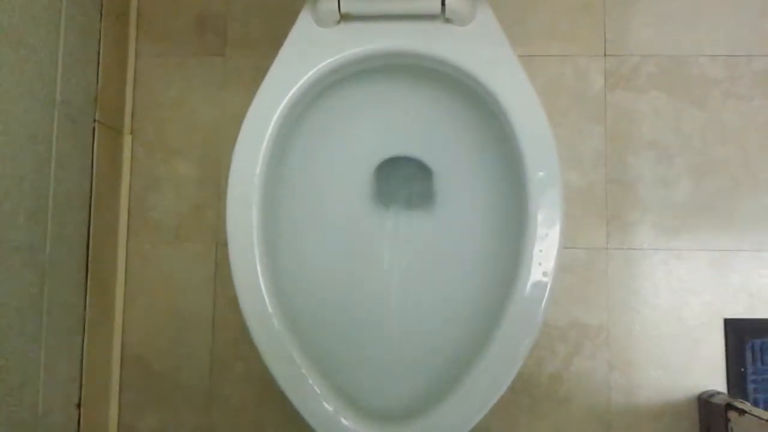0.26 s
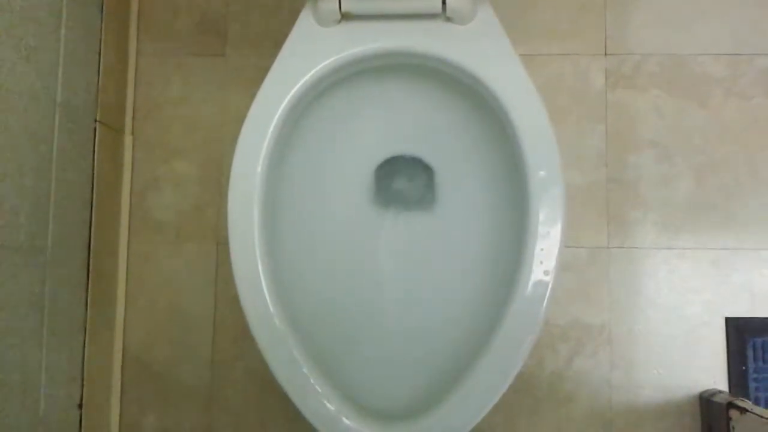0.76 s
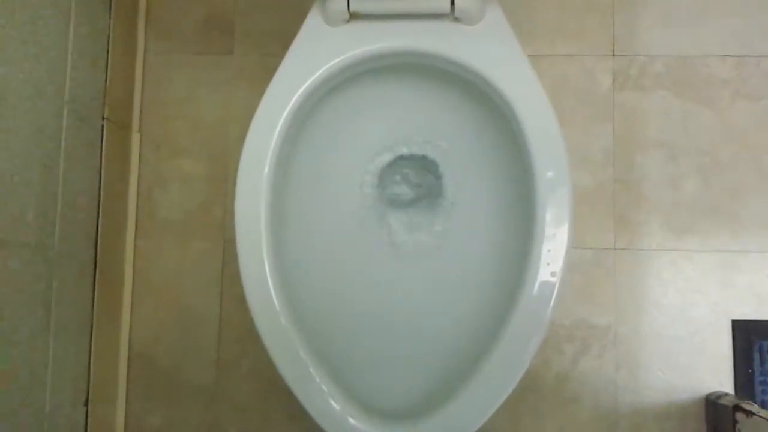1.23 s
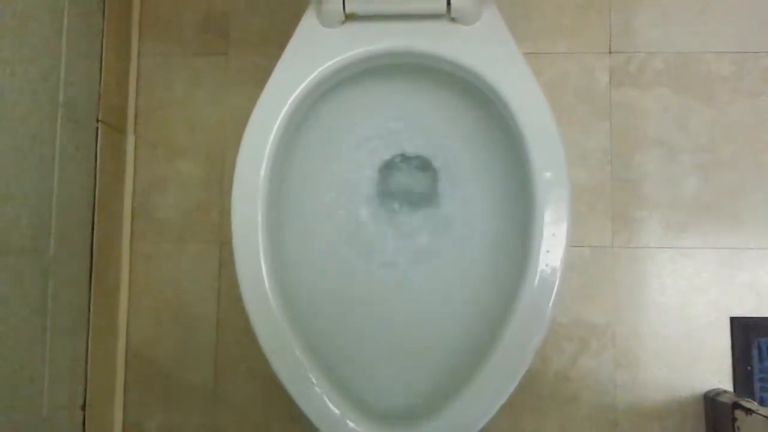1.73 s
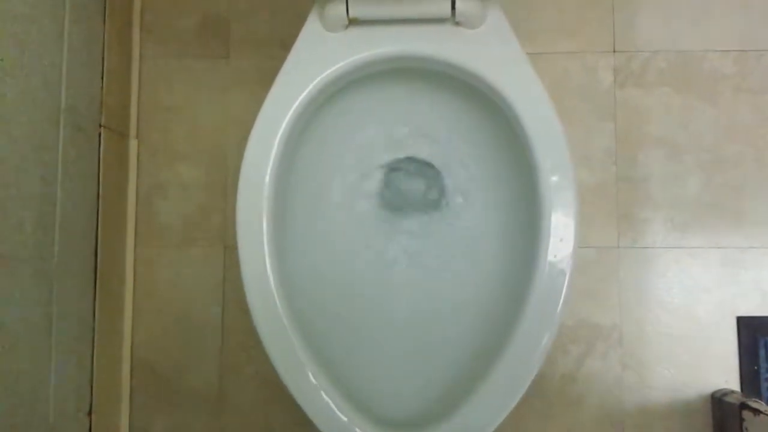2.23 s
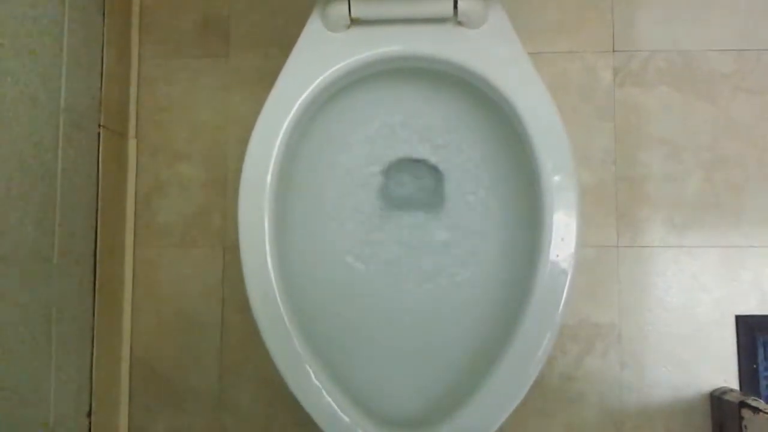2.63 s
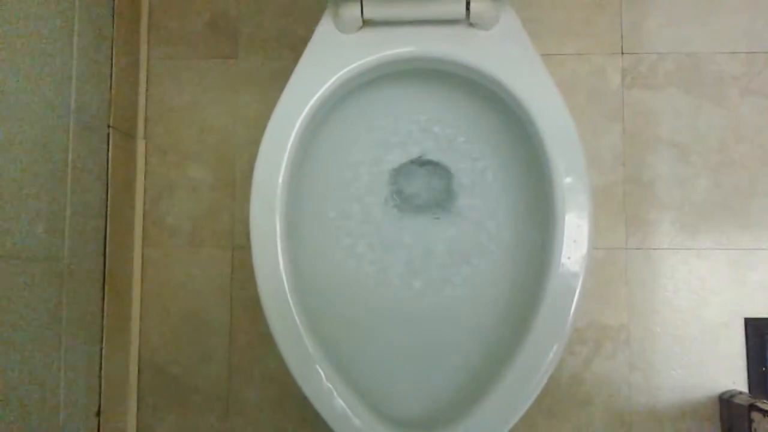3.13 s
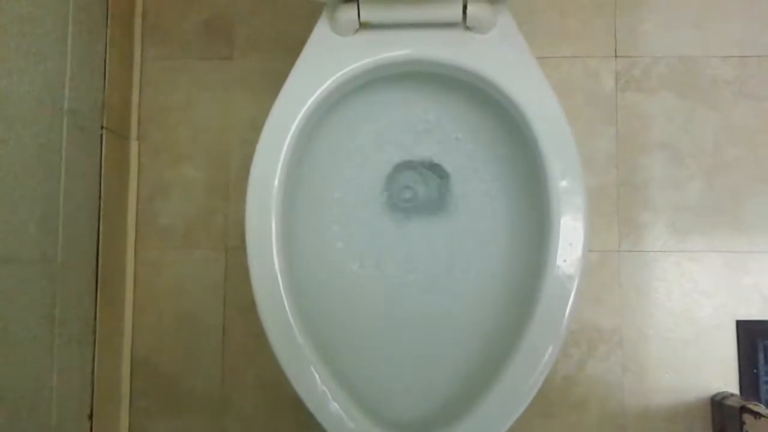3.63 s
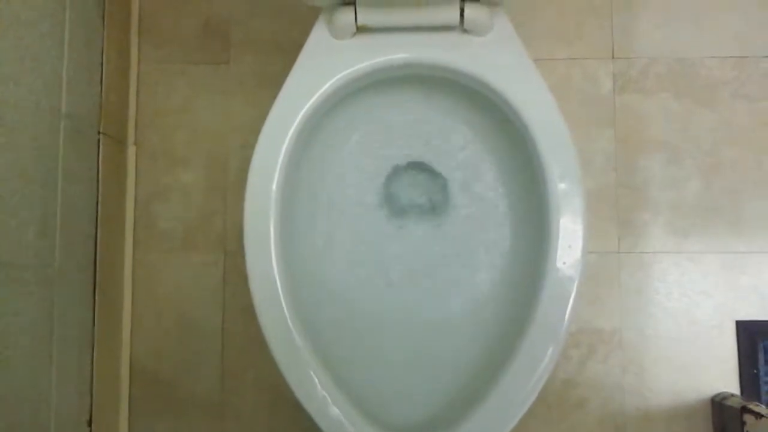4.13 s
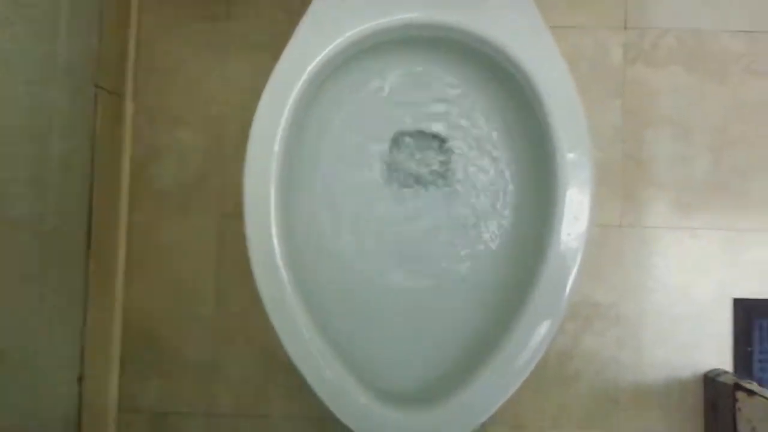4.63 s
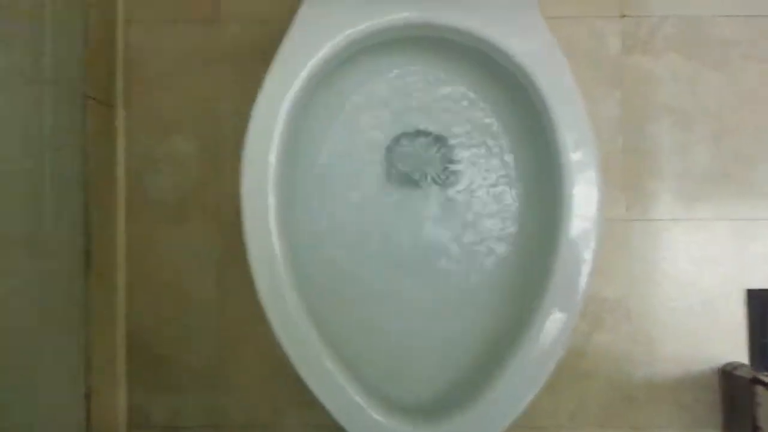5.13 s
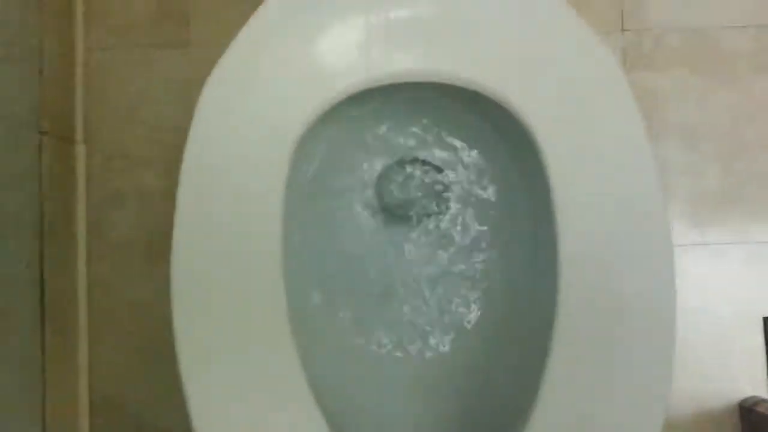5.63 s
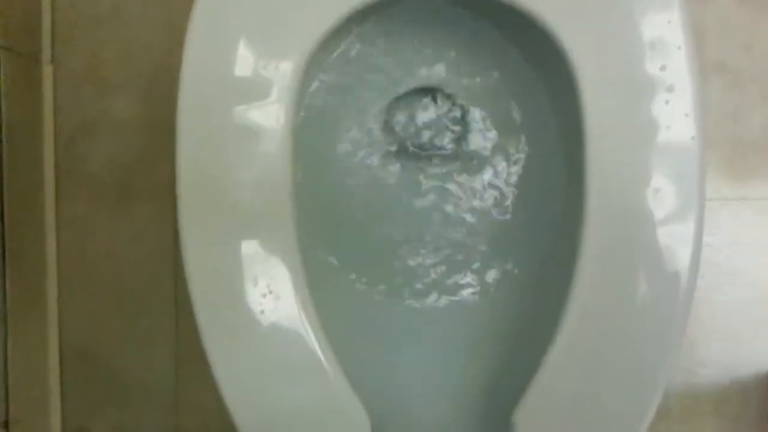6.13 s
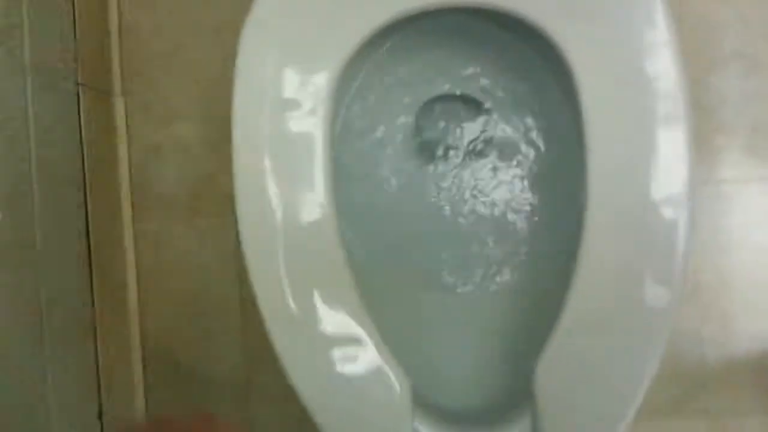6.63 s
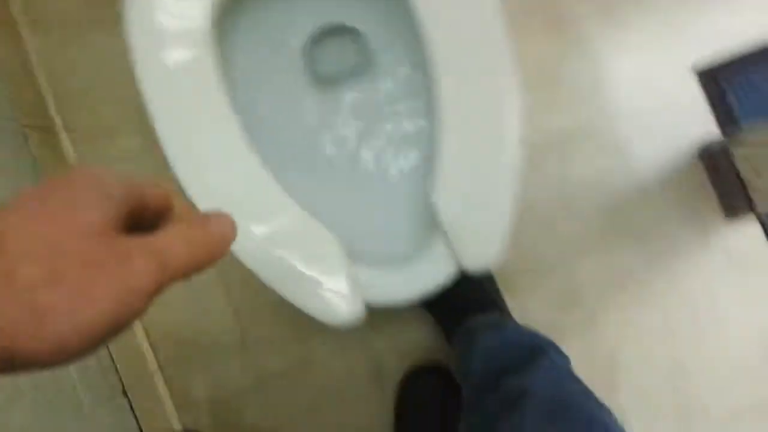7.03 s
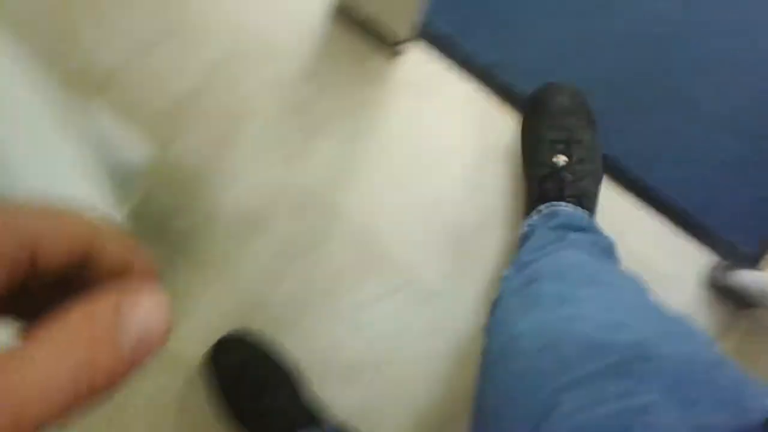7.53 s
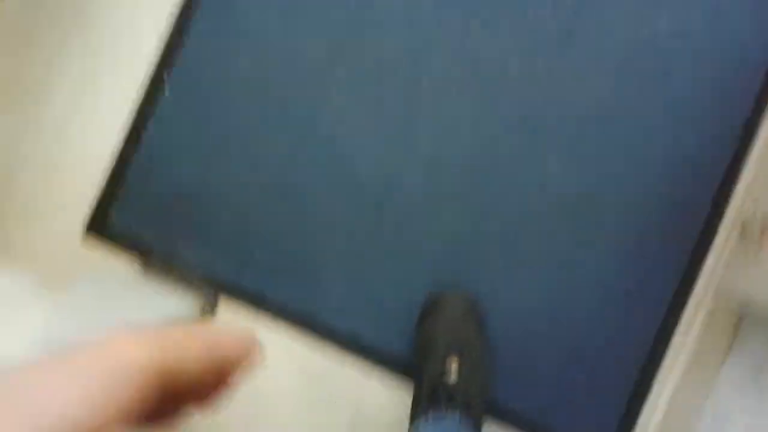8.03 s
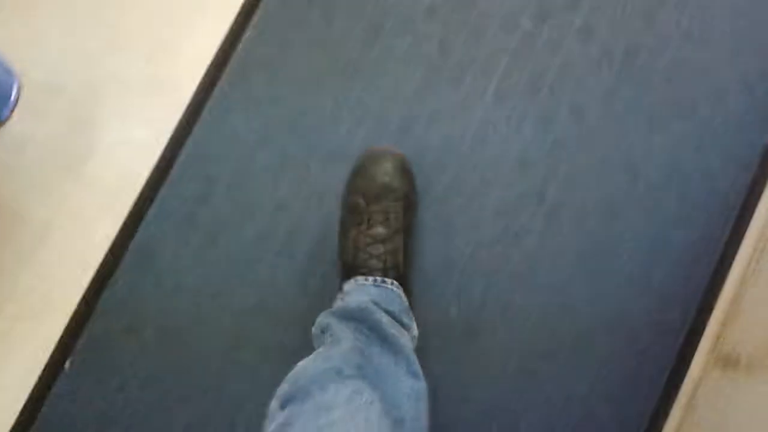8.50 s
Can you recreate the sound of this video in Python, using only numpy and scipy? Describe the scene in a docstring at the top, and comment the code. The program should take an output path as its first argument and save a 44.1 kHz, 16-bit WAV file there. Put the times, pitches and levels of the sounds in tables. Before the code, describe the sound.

Close, hand-held stereo pickup above a toilet in a small tiled restroom. The flush is already at full force, with splashing, bubbling, hissing jets and a booming drain, then quickly thins to trickling and weak gulps. Near-silence with faint ventilation follows, broken by finger bumps on the microphone. The plastic seat cracks down and rattles briefly, then shoes step and scuff softly over faint running water.

```python
"""A flush-valve toilet empties in a small tiled restroom: rim jets hiss, bubbles churn in the bowl and the
trapway booms, then gulps air as the flow dies. Over a faint wash of water and a humming ventilation the seat
drops onto the china, feet step and scuff, and fingers tick on the hand-held two-port microphone.
Water is shaped noise and swarms of ringing bubbles; the drain and the seat are resonances and dying sines;
steps and touches are short bursts. China and tiles add dense reflections."""
import sys
import numpy as np
from scipy import signal
from scipy.fft import rfft, irfft
from scipy.io import wavfile
from scipy.ndimage import uniform_filter1d

SR = 44100
rng = np.random.default_rng(int(sys.argv[2]) if len(sys.argv) > 2 else 0)


def int16_out(signal):
    """Quantize to a 16-bit WAV file."""
    q = np.round(np.clip(np.atleast_2d(signal).T, -1, 1) * 32767)
    wavfile.write(sys.argv[1], SR, q.astype(np.int16))


N = 386316
TIME = np.arange(N) / SR


def from_db(db):
    """Decibels to gain."""
    return 10 ** (np.asarray(db) / 20)


def rms_one(x):
    """Scale to unit power."""
    return x / np.sqrt(np.mean(x ** 2) + 1e-20)


def gains(rows):
    """Level curves as gains that die away quickly outside their span."""
    s, *columns = np.transpose(rows)
    outside = np.abs(TIME - np.clip(TIME, s[0], s[-1]))
    fade = np.exp(-np.minimum(outside / 0.049, 20))
    return [from_db(np.interp(TIME, s, column)) * fade for column in columns]


def at_hz(points):
    """A table read at every frequency, on a log axis."""
    hz, value = np.transpose(points)
    bins_hz = np.arange(N // 2 + 1) * SR / N
    return np.interp(np.log(bins_hz + 1), np.log(hz), value)


def colour(x, spectrum):
    """Give a sound a smooth spectrum."""
    return irfft(rfft(x) * from_db(at_hz(spectrum)), N)


# How alike diffuse sound is at the two microphone ports: (frequency [Hz], likeness [0-1])
PORT_LIKENESS = [(60, .92), (290, .96), (630, .8), (1370, .3), (3000, 0), (14000, 0)]


def diffuse(spectrum):
    """Noise from all sides: alike at both ports in the bass, unrelated in the treble."""
    alike = np.clip(at_hz(PORT_LIKENESS), -1, 1)
    mid, side = rfft(rng.standard_normal((2, N)))
    both = np.sqrt(1 + alike) * mid + np.sqrt(1 - alike) * side * [[1], [-1]]
    return rms_one(irfft(both * from_db(at_hz(spectrum)), N))


def drift(rate):
    """Chance wandering with spread 1, through rate new values per second."""
    knots = rng.standard_normal(int(N / SR * rate) + 2)
    return rms_one(np.interp(TIME * rate, np.arange(len(knots)), knots))


def even(x, span_s):
    """Hold the power steady over a span, keeping the faster grain."""
    power = np.mean(np.atleast_2d(x) ** 2, axis=0)
    smooth = np.abs(uniform_filter1d(power, int(span_s * SR)))
    return x / np.sqrt(smooth + 1e-4 * power.mean())


def grains(per_s, spread_db):
    """Clicks at random moments, of uneven size and sign."""
    born = np.flatnonzero(rng.random(N) < per_s / SR)
    clicks = np.full(N, 1e-18)
    size_db = spread_db * np.minimum(rng.exponential(1, len(born)), 4)
    clicks[born] = from_db(size_db) * rng.choice([-1, 1], len(born))
    return clicks


def resonate(x, hz, width_hz):
    """A two-pole resonance with gain 1 on top."""
    r = np.exp(-np.pi * width_hz / SR)
    feedback = [1, -2 * r * np.cos(2 * np.pi * hz / SR), r * r]
    return signal.lfilter(np.array([1, 0, -1]) * (1 - r * r) / 2, feedback, x)


def ping(s, hz, t60, rise=0):
    """A dying sine from time s, its pitch rising by a share per t60."""
    out, start = np.zeros(N), int(s * SR)
    age = TIME[:min(int(2 * t60 * SR), N - start)]
    cycles = hz * age * (1 + rise * age / t60 / 2)
    out[start:start + len(age)] = from_db(-60 * age / t60) * np.sin(2 * np.pi * cycles)
    return out


def swells(times, levels_db, attack_s, t60):
    """Envelope of bursts that rise fast and die away; their powers add."""
    power = np.zeros(N)
    for s, db in zip(times, levels_db):
        start = int(s * SR)
        age = TIME[:min(int(2 * t60 * SR), N - start)]
        burst = from_db(db - 60 * age / t60) * (1 - np.exp(-age / attack_s))
        power[start:start + len(age)] += burst ** 2
    return np.sqrt(power)


def restroom(x, wet_db, t60):
    """Direct sound plus dense reflections from china and tiles."""
    age = TIME[:SR // 2]
    tail = diffuse([(100, 0), (14000, 0)])[:, :len(age)] * from_db(-60 * age / t60) * (age > .001)
    tail = tail / np.sqrt(np.sum(tail ** 2) / 2)
    reflected = signal.fftconvolve(np.atleast_2d(x), tail, axes=1)[:, :N]
    return (x + from_db(wet_db) * reflected) / np.hypot(1, from_db(wet_db))


def bubbles(low_hz, high_hz, per_s, cycles, spread_db, count):
    """A swarm of bubbles of many sizes, each ringing for a few cycles; even power per Hz."""
    pitches = np.geomspace(low_hz, high_hz, count)
    return sum(resonate(grains(per_s / count, spread_db), hz, 2 * hz / cycles) for hz in pitches)


# The valve closes slowly and the rush dies with it; levels before each layer's trim:
# (time [s], splash level [dB], jet hiss level [dB])
RUSH_LEVELS = [(0.0, -21, -25), (0.14, -23.5, -26.5), (0.31, -26.5, -28), (0.68, -30.5, -32.5),
               (0.92, -36, -33), (1.12, -49, -39), (1.33, -50.5, -43.5), (1.55, -46, -43.5),
               (2.13, -55, -51.5), (2.62, -54.5, -51.5), (2.93, -62.5, -55.5), (3.38, -63.5, -66.5),
               (3.8, -76.5, -82)]
# Share of the hiss that narrows to the ring of the rim holes, until they run dry: (time [s], share [0-1])
HISS_NARROWING = [(.6, .05), (1.5, 0.5), (2.85, .62), (3.25, .1)]


def bowl():
    """The rush drives churning water and rim jets; every big bubble that bursts adds splash and spray."""
    splash, hiss = gains(RUSH_LEVELS)
    thin = np.clip(np.interp(TIME, *np.transpose(HISS_NARROWING)), .01, 1)
    s, plop_db, _ = np.transpose(BIG_BUBBLES)
    bursts = swells(s, plop_db, attack_s=0.0015, t60=0.17)
    return churn(splash, bursts, thin) + jets(hiss, bursts, thin)


# Spectrum of the churning water: (frequency [Hz], level [dB per Hz])
SPLASH_SPECTRUM = [(60, -46), (200, -21.5), (370, -1.5), (480, -7.5), (650, -8.5), (850, -1), (1300, -3.5),
                   (1650, 0.5), (2600, -0.5), (3400, -5.5), (4500, -13), (8000, -39.5)]
SPLASH_TRIM_DB = 2.5
PLOP_SPLASH_DB = -15  # splash of a bursting bubble, before the trim of the bubble's own ring
DRIPS_DB = -4  # stray drips, relative to the splash


def churn(splash, bursts, thin):
    """Water churns as a ringing bubble swarm with crackle and noise, hollowed by the china; drips stand out."""
    swarm = colour(bubbles(370, 5000, per_s=1000, cycles=20, spread_db=5.0, count=30), SPLASH_SPECTRUM)
    crackle = rms_one(colour(grains(500, spread_db=3.5), SPLASH_SPECTRUM))
    water = rms_one(swarm) + from_db(-5) * crackle + from_db(-9.5) * diffuse(SPLASH_SPECTRUM)
    water = even(restroom(water, wet_db=1.5, t60=0.13), 0.13)
    # as the pressure falls, single drips stand out
    drips = bubbles(1620, 2500, per_s=88, cycles=58, spread_db=1.5, count=10)
    drips = even(restroom(drips, wet_db=4.5, t60=0.12), 0.3) * np.sqrt(thin / thin.max())
    splash = from_db(SPLASH_TRIM_DB) * splash
    return np.hypot(splash, from_db(PLOP_SPLASH_DB) * bursts) * water + from_db(DRIPS_DB) * splash * drips


# Spectrum of the full jets: (frequency [Hz], level [dB per Hz])
JET_SPECTRUM = [(1500, -24), (3300, -15.5), (4300, -0.5), (5300, 2.5), (6500, -5), (7600, -12),
                (10000, -14.5), (12800, -15), (14500, -23)]
# Spectrum of the hiss narrowed to the ring of the rim holes: (frequency [Hz], level [dB per Hz])
THIN_JET_SPECTRUM = [(1500, -28), (3300, -15.5), (4100, -16), (4800, -7.5), (5350, -3.5), (5950, -11),
                     (6600, -8), (7600, -16.5), (10500, -23.5), (13000, -19.5), (14500, -24.5)]
HISS_TRIM_DB, HISS_FLUTTER_DB, HISS_FLUTTER_PER_S = 3.5, 1.4, 20
PLOP_SPRAY_DB = -24.5  # spray of a bursting bubble, before the trim of the bubble's own ring
FLECKS_DB = -9.5  # flecks of spray hitting the china, relative to the hiss


def jets(hiss, bursts, thin):
    """Rim jets hiss as noise and fizz as tiny bubbles, narrowing with falling pressure; flecks hit the china."""
    fizz = bubbles(3300, 12000, per_s=2000, cycles=9.8, spread_db=7.0, count=12)
    fizz = even(colour(fizz, JET_SPECTRUM), 0.03)
    spray = rms_one(fizz + from_db(6.5) * diffuse(JET_SPECTRUM))
    mixed = np.sqrt(1 - thin) * spray + np.sqrt(thin) * diffuse(THIN_JET_SPECTRUM)
    mixed = rms_one(restroom(mixed, wet_db=-8.0, t60=0.03))
    flecks = bubbles(4200, 6300, per_s=45, cycles=17, spread_db=-3.5, count=8)
    flecks = even(restroom(flecks, wet_db=10.0, t60=0.045), 0.34)
    hiss = from_db(HISS_TRIM_DB + HISS_FLUTTER_DB * drift(HISS_FLUTTER_PER_S)) * hiss
    return np.hypot(hiss, from_db(PLOP_SPRAY_DB) * bursts) * mixed + from_db(FLECKS_DB) * hiss * flecks


# Large single bubbles, levels before the trim: (time [s], level [dB], starting pitch [Hz])
BIG_BUBBLES = [(0.088, -12, 1590), (0.125, -9.5, 1636), (0.157, -12, 1580), (0.211, -15, 2000),
               (0.279, -19.5, 798), (0.362, -15.5, 826), (0.516, -17, 2560), (0.568, -18.5, 932),
               (0.672, -19, 2200), (0.752, -17, 2600), (0.942, -15, 1800), (0.974, -18.5, 2240),
               (1.012, -18.5, 3560), (1.084, -21.5, 2820), (1.108, -14, 4920), (1.33, -34.5, 1016),
               (1.344, -28, 1504), (1.455, -31, 1980), (1.5, -37.5, 946), (1.598, -26, 1294),
               (1.626, -26, 864), (1.643, -24.5, 718), (1.665, -33, 698), (1.803, -30.5, 1610),
               (2.488, -33, 2200), (2.525, -27.5, 1670), (2.578, -30, 4450), (3.774, -46, 2280),
               (3.86, -51, 1967)]
PLOP_TRIM_DB = -2.0


def plops():
    """Big bubbles ring and rise in pitch as they reach the surface; the bowl's echoes roughen them."""
    rings = sum(from_db(db) * ping(s, hz, .008 + 62 / hz, rise=.09) for s, db, hz in BIG_BUBBLES)
    return from_db(PLOP_TRIM_DB) * restroom(rings, wet_db=3.0, t60=.16)


# Gulps of air in the trapway, levels before the trims:
# (time [s], length [s], boom level [dB], rumble level [dB])
AIR_GULPS = [(0.0, 0.015, -25.5, -39), (0.109, 0.035, -25, -36.5), (.195, 0.018, -20.5, -31),
             (0.244, 0.019, -27, -45), (.32, 0.046, -30.5, -55), (0.438, 0.11, -21, -39),
             (0.508, 0.1, -19, -36.5), (0.741, 0.023, -24, -33.5), (0.865, 0.013, -28, -57),
             (0.934, 0.035, -43, -49), (1.322, 0.05, -42.5, -51), (1.454, 0.024, -41.5, -41),
             (1.514, 0.018, -37, -38.5), (1.589, 0.04, -31, -51), (2.342, 0.043, -43, -54),
             (2.898, .01, -41.5, -53), (2.97, 0.011, -48.5, -48), (3.073, 0.043, -40, -41),
             (3.158, 0.019, -37, -43.5), (3.227, 0.013, -38.5, -39.5), (3.306, .01, -40, -40),
             (3.357, 0.042, -40.5, -43.5), (3.435, 0.032, -37, -41.5), (3.501, .01, -43, -44.5),
             (3.58, 0.0074, -41.5, -41.5)]
GULP_ATTACK_S, GULP_T60_S = .004, 0.28


def gulping(levels_db):
    """Envelope of the gulps: each rises, holds for its length and dies away; their powers add."""
    power = np.zeros(N)
    for (s, length, *_), db in zip(AIR_GULPS, levels_db):
        start = max(int(s * SR), 0)
        age = TIME[:SR]
        decay = from_db(-60 * np.maximum(age - length, 0) / GULP_T60_S)
        shape = (1 - np.exp(-age / GULP_ATTACK_S)) * decay
        power[start:start + SR] += (from_db(db) * shape) ** 2
    return np.sqrt(power)


# Droplets spat up by the last gulps, levels before the trim: (time [s], level [dB])
DROPLET_SPITS = [(3.0805, -46), (3.1694, -65), (3.236, -46), (3.305, -47), (3.3847, -53), (3.454, -53),
                 (3.4994, -55), (3.59, -46.5)]
# Spectrum of the droplets: (frequency [Hz], level [dB per Hz])
DROPLET_SPECTRUM = [(1200, -17), (2000, -9), (3200, -5.5), (4600, 3), (6200, -3), (7500, -11), (14000, -11)]
# Spectrum of the fine spray that hangs after the spits: (frequency [Hz], level [dB per Hz])
MIST_SPECTRUM = [(2000, -22), (6000, 0), (14000, 0)]


def spits():
    """The last gulps throw up ringing droplets and a lingering mist of noise."""
    times, levels_db = np.transpose(DROPLET_SPITS)
    drops = bubbles(1500, 7000, per_s=900, cycles=25, spread_db=3.0, count=10)
    drops = even(restroom(colour(drops, DROPLET_SPECTRUM), wet_db=10.0, t60=0.19), 0.031)
    droplets = drops * from_db(2.0) * swells(times, levels_db, attack_s=0.0033, t60=0.097)
    mist = diffuse(MIST_SPECTRUM) * from_db(-16.5) * swells(times, levels_db, attack_s=.008, t60=0.71)
    return droplets + mist


# Steady draw of the drain between gulps, before the trims: (time [s], boom level [dB], rumble level [dB])
DRAIN_LEVELS = [(0.0, -39, -41.5), (0.95, -49, -50.5), (1.25, -60.5, -54), (1.6, -44.5, -45.5),
                (2.2, -50, -48.5), (2.9, -55, -54)]
# Overtones of the trapway's air column: (frequency [Hz], width [Hz], level [dB])
AIR_COLUMN_OVERTONES = [(368, 6.4, -0.5), (604.3, 20, 2.5), (932, 8, 4), (1264, 18, -2), (1611, 18, -6.5),
                        (1921, 40, -6), (2180, 91, -10.5), (2490, 36, -17)]
# Spectrum of the drain's rumble: (frequency [Hz], level [dB per Hz])
RUMBLE_SPECTRUM = [(25, -35.5), (45, -27), (62, -2), (85, -4), (113, 2.5), (150, 3), (190, -13.5),
                   (235, -13.5), (330, -16), (500, -30.5), (1500, -78)]
TRAP_HZ, TRAP_WIDTH_HZ = 284, 40  # lowest mode of the air column
BOOM_TRIM_DB, RUMBLE_TRIM_DB, OVERTONES_TRIM_DB, SHOVE_TRIM_DB = -3.5, -1.83, -10, -0.5


def trapway():
    """Collapsing air pockets drive the air column of the drain: a steady draw broken by gulps."""
    s, _, boom_db, rumble_db = np.transpose(AIR_GULPS)
    steady_boom, steady_rumble = gains(DRAIN_LEVELS)
    boom = np.hypot(steady_boom, gulping(boom_db))
    rumble = np.hypot(steady_rumble, gulping(rumble_db))
    pockets = grains(420, spread_db=2.0)
    # the lowest mode sustains itself as a wavering tone, roughened by the pockets
    pitch_hz = TRAP_HZ * (1 + .018 * drift(55))
    tone = np.sqrt(2) * np.sin(2 * np.pi * np.cumsum(pitch_hz) / SR)
    rattle = rms_one(resonate(resonate(pockets, TRAP_HZ, TRAP_WIDTH_HZ), TRAP_HZ, 230))
    loud = np.clip(boom / from_db(-40.5), .1, 1)  # a weak flow mostly rattles the mode
    column = even(loud * tone + from_db(-2.5) * rattle, 0.064)
    # each gulp shoves the water in the bowl
    shove = sum(from_db(db + SHOVE_TRIM_DB) * ping(max(at, 0), 63, 0.1) for at, db in zip(s, rumble_db))
    overtones = sum(from_db(db) * resonate(pockets, hz, width) for hz, width, db in AIR_COLUMN_OVERTONES)
    body = from_db(RUMBLE_TRIM_DB) * even(diffuse(RUMBLE_SPECTRUM), 0.12)
    body = body + from_db(OVERTONES_TRIM_DB) * even(overtones, .06)
    return from_db(BOOM_TRIM_DB) * boom * column + rumble * body + shove + spits()


# The seat lands and bounces, levels before the trims: (time [s], level [dB])
SEAT_LANDINGS = [(6.0971, -16.5), (6.1183, -23.5), (6.1467, -28)]
# Modes of the seat on the rim, before a slight stretch: (frequency [Hz], level [dB], t60 [s])
SEAT_RESONANCES = [(479, -9, .19), (635, -12, .2), (904, -1, .22), (980, -1, .23), (1044, -6, .27),
                   (1114, -9, .22), (1529, -7, .16), (1653, -5, .12), (1868, -5, .15), (1970, -5, .16),
                   (2196, -5, .15), (2239, -7, .16), (2573, -13, .15), (2729, -9, .12), (3214, -6, .13)]
# Spectrum of the seat's clap: (frequency [Hz], level [dB per Hz])
SEAT_SPECTRUM = [(60, -33), (120, 0), (300, -9.5), (480, -11), (720, -5), (950, 6), (1350, -9), (1600, 0.5),
                 (2200, -7), (2700, -10.5), (3300, -15.5), (4500, -21), (7500, -41.5), (12000, -88)]
SEAT_RING_DB = -7


def seat():
    """The hard plastic seat cracks onto the rim, clatters and rings; the tiles throw the clap back."""
    s, db = np.transpose(SEAT_LANDINGS)
    rings = np.zeros(N)
    for at, hit_db in SEAT_LANDINGS:
        for hz, level_db, t60 in SEAT_RESONANCES:
            rings += from_db(hit_db + level_db) * rng.choice([-1, 1]) * ping(at, hz, 1.03 * t60)
    # the rings are dulled above 3.8 kHz
    rings = signal.sosfilt(signal.butter(2, 3800, fs=SR, output="sos"), rings)
    crack = swells(s, db - 2.5, attack_s=.0001, t60=0.035)
    echo = swells(s, db - 7.5, attack_s=0.013, t60=0.28)
    clap = even(diffuse(SEAT_SPECTRUM), 0.0024) * (crack + echo)
    return (from_db(SEAT_RING_DB) * rings + clap) * from_db([[1.2], [-1.2]])  # stronger at the left port


# Footfalls and bumps, before the trims:
# (time [s], level [dB], thud relative level [dB], scuff relative level [dB])
FOOTFALLS = [(5.083, -41.5, -13.5, -7), (6.768, -40, -6, -6), (6.883, -27.5, -12, -7.5),
             (7.036, -44, -10, -7), (7.241, -41.5, -14, -10.5), (7.402, -44, -16, -12),
             (7.7, -45, -9.5, -7), (7.82, -49, -17, -7), (8.154, -44.5, -9, -6.5), (8.581, -44, 4, -8)]
# Spectrum of the thud in the floor: (frequency [Hz], level [dB per Hz])
THUD_SPECTRUM = [(30, -34), (70, 2.5), (110, 2), (170, 4), (240, -9), (400, -11), (1500, -80)]
# Spectrum of the hollow clunk in the stall: (frequency [Hz], level [dB per Hz])
CLUNK_SPECTRUM = [(60, -40.5), (150, -9), (250, -1.5), (360, -1), (480, -12.5), (700, -9.5), (1100, -22),
                  (4000, -71)]
# Spectrum of the scuffing sole: (frequency [Hz], level [dB per Hz])
SCUFF_SPECTRUM = [(500, -44), (900, 3), (1400, 5.5), (2200, 8.5), (3300, 2.5), (5000, -3.5), (7500, -17.5),
                  (14000, -47)]
SETTLE_S, SETTLE_DB = 0.061, -12.5  # the weight settles in a second, weaker contact


def steps():
    """Shoes and bumps: floor thud, hollow stall clunk, scuff. Light steps roll on slowly and last longer."""
    s, db, thud_db, scuff_db = np.transpose(FOOTFALLS)
    light = np.clip((-41.5 - db) / 4.5, 0, 1)
    floor, stall = even(diffuse(THUD_SPECTRUM), 0.045), even(diffuse(CLUNK_SPECTRUM), 0.023)
    sole = diffuse(SCUFF_SPECTRUM)

    def blows(levels_db, attack_s, t60):
        """Envelope of all steps; attack and decay are those of a firm step."""
        total = np.zeros(N)
        for at, level_db, soft in zip(s, levels_db, light):
            contacts_db = level_db - 1.4 * soft + np.array([0, SETTLE_DB])
            total += swells([at, at + SETTLE_S], contacts_db, attack_s + 0.011 * soft, t60 + 0.126 * soft)
        return total

    thuds = floor * blows(db + thud_db - 2, 0.0018, 0.44)
    clunks = stall * blows(db - 6.5, 0.00068, 0.22)
    return thuds + clunks + sole * blows(db + scuff_db - 2.0, 0.00032, 0.14)


# Fingers on the microphone's case, before the rub's trim and the bass cut: (time [s], bump level [dB],
# bump [Hz], tick level [dB], tick [Hz], rub level [dB], rub t60 [s], left-right balance [dB])
FINGER_TOUCHES = [(4.2937, -17.5, 336, -27, 1590, -34, 0.017, -10.5),
                  (4.308, -29, 480, -41.5, 753, -52, 0.12, -18),
                  (4.353, -37, 300, -30.5, 1850, -47, 0.016, -4),
                  (6.5, -71, 398, -45.5, 1830, -60.5, 0.084, 8),
                  (8.667, -24, 204, -28.5, 724, -47, .01, -27),
                  (8.6707, -56, 132, -28.5, 5450, -46.5, 0.015, -23)]
TOUCH_LOW_CUT_HZ = 110  # the touches are cut below this


def touches():
    """Each touch bumps the case for a cycle or two, ticks and rubs, mostly at one port."""
    out = np.zeros((2, N))
    skin = diffuse([(200, -2), (500, 1.0), (2200, 0.0), (3300, -15), (5000, -4.5), (8000, -22.0), (14000, -26)])
    for s, bump_db, bump_hz, tick_db, tick_hz, rub_db, rub_t60, pan_db in FINGER_TOUCHES:
        bump = from_db(bump_db) * ping(s, bump_hz, 2.0 / bump_hz)
        tick = from_db(tick_db) * ping(s, tick_hz, 0.0035)
        rub = skin * swells([s], [rub_db + 4.0], attack_s=0.00011, t60=rub_t60)
        sides = from_db([[pan_db / 2], [-pan_db / 2]])
        out += (bump + tick + rub) * sides / sides.mean()
    return signal.sosfilt(signal.butter(2, TOUCH_LOW_CUT_HZ, "high", fs=SR, output="sos"), out)


# Water running on afterwards, before the trim: (time [s], level [dB])
WASH_LEVELS = [(3.7, -79), (4.3, -82.5), (5.1, -76.5), (5.85, -66), (6.55, -68.5), (6.95, -57), (7.65, -67),
               (7.95, -63.5), (8.4, -67), (8.76, -59.5)]
# Spectrum of that water: (frequency [Hz], level [dB per Hz])
WASH_SPECTRUM = [(150, -8.5), (280, -0.5), (520, -5.5), (800, -8.5), (1300, -9.5), (2000, -5.5),
                 (3400, -10.5), (5200, -8.5), (7200, -18), (14500, -24.5)]
# Spectrum of the ventilation: (frequency [Hz], level [dB per Hz])
VENT_SPECTRUM = [(20, -34.5), (40, -15.5), (68, -1), (95, -9), (130, -4), (200, -16), (350, -20.5),
                 (600, -25), (1300, -28), (1900, -26.5), (3000, -34), (14500, -48)]
WASH_TRIM_DB, HUM_DB, VENT_DB = 2.5, -71.0, -64.5


def background():
    """Water keeps washing down the bowl as noise; the ventilation rumbles and hums at a wavering level."""
    wash, = gains(WASH_LEVELS)
    water = from_db(WASH_TRIM_DB) * wash * diffuse(WASH_SPECTRUM) * from_db(0.3 * drift(27))
    hum = from_db(HUM_DB) * np.sin(2 * np.pi * 120 * TIME) * from_db(1.5 * drift(1.2))
    return water + hum + from_db(VENT_DB) * diffuse(VENT_SPECTRUM)


def scene():
    """Everything that is heard in the stall."""
    return bowl() + plops() + trapway() + seat() + steps() + touches() + background()


# Balance of the two microphone ports: (frequency [Hz], left-right level [dB])
PORT_TILT = [(60, -0.5), (700, -2.5), (1260, 0), (2000, 5), (2800, 4.5), (3500, -1.5), (4800, -15.5),
             (6500, -14), (8000, -16.5), (9500, -8.5), (14000, -7)]
PORT_LAG_S, SELF_NOISE_DB = .00009, -70  # noise level before the cuts
LOW_CUT_HZ, HIGH_CUT_HZ = 42, 14650


def record(dry):
    """The left port lies a little farther off, dull in the treble; faint self-noise; deep bass and top are cut."""
    tilt = from_db(at_hz(PORT_TILT) / 2 * np.array([[1], [-1]]))
    tilt = tilt / np.sqrt(np.mean(tilt ** 2, axis=0))
    left, right = irfft(rfft(dry) * tilt, N)
    left = np.interp(TIME - PORT_LAG_S, TIME, left)
    heard = np.array([left, right]) + from_db(SELF_NOISE_DB) * rng.standard_normal((2, N))
    heard = signal.sosfilt(signal.butter(2, LOW_CUT_HZ, "high", fs=SR, output="sos"), heard)
    return signal.sosfilt(signal.ellip(12, .2, 80, HIGH_CUT_HZ, fs=SR, output="sos"), heard)


dry = scene()
out = record(dry)
int16_out(out)
```